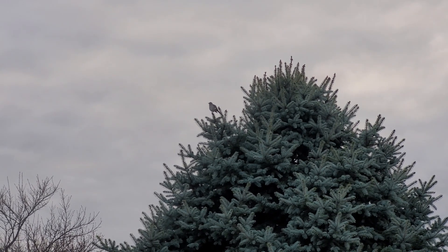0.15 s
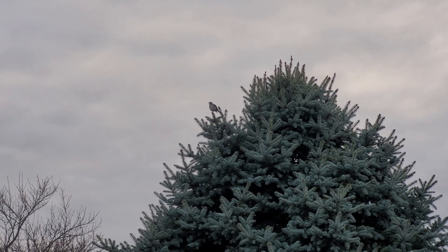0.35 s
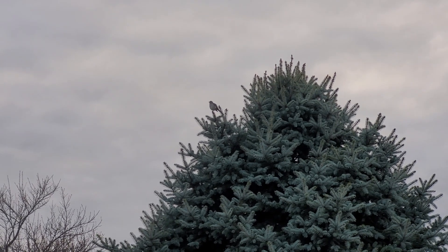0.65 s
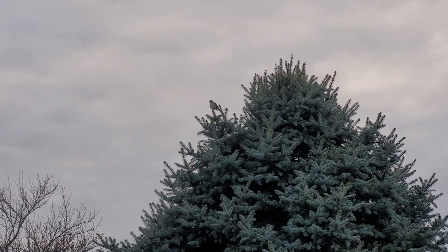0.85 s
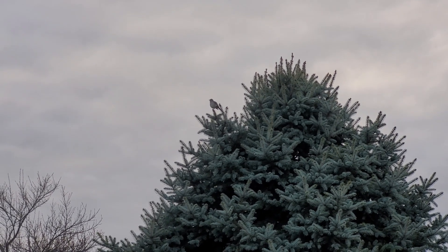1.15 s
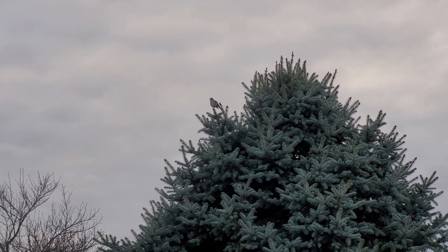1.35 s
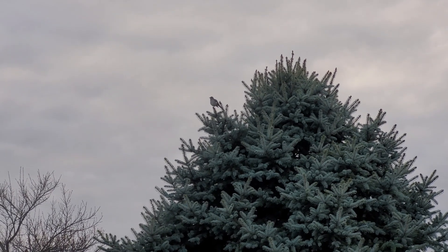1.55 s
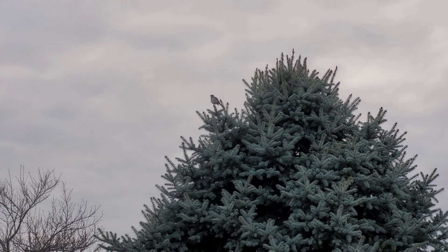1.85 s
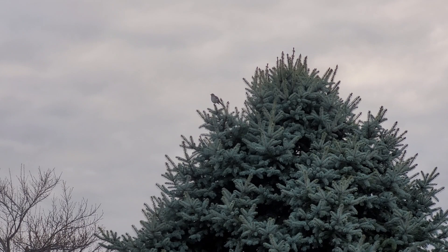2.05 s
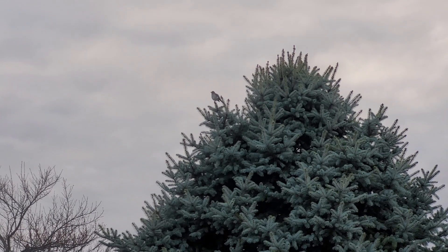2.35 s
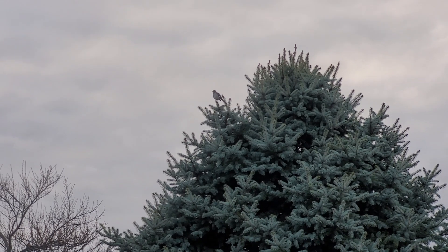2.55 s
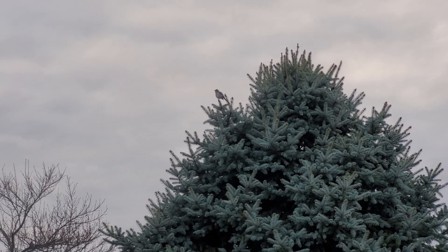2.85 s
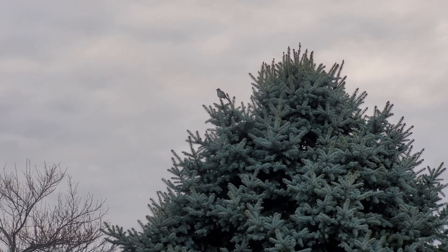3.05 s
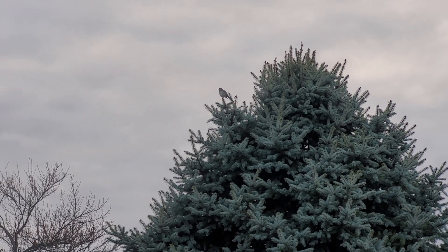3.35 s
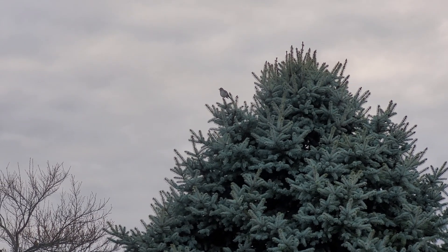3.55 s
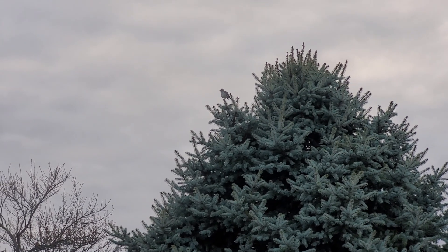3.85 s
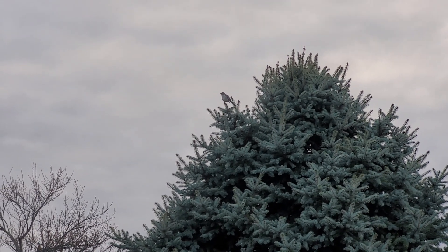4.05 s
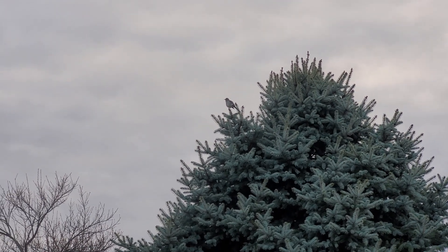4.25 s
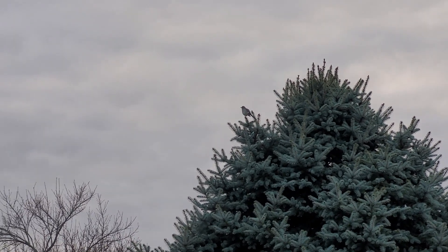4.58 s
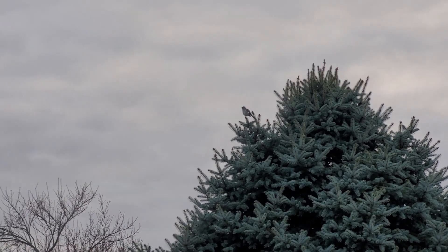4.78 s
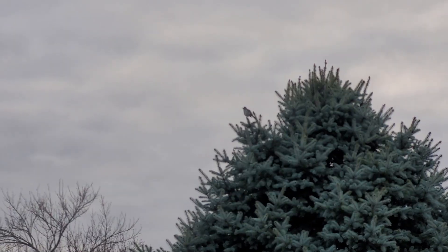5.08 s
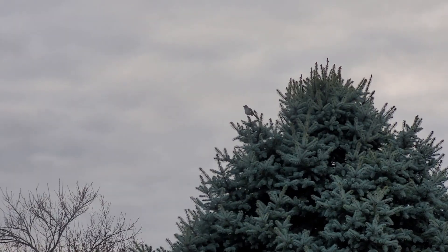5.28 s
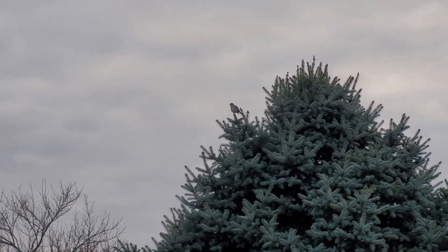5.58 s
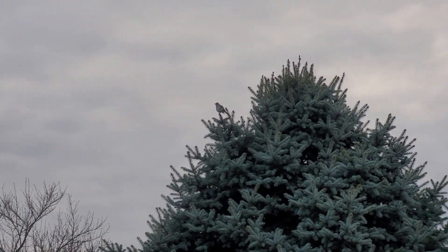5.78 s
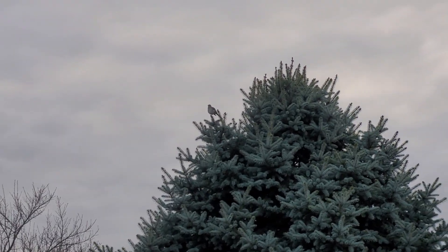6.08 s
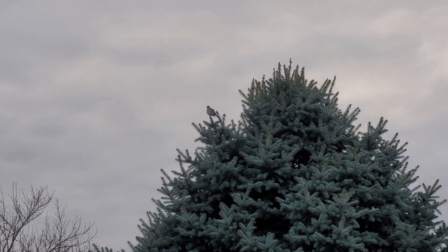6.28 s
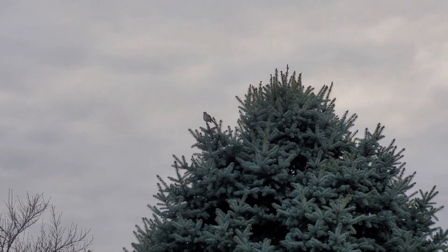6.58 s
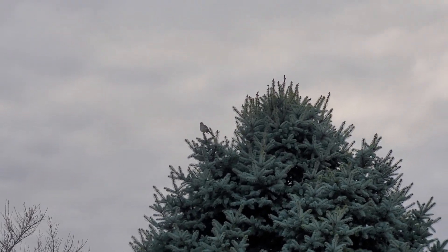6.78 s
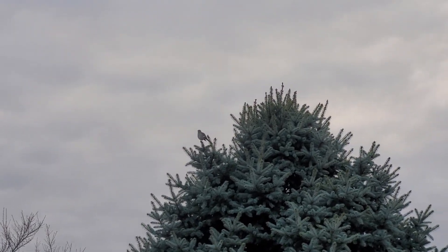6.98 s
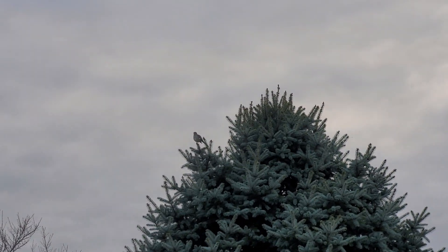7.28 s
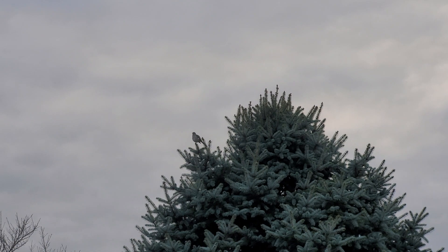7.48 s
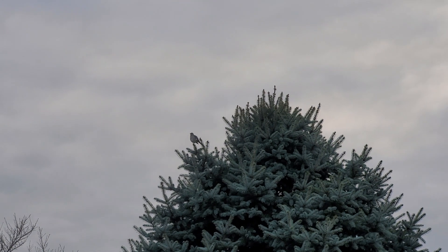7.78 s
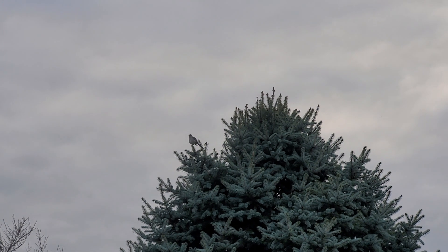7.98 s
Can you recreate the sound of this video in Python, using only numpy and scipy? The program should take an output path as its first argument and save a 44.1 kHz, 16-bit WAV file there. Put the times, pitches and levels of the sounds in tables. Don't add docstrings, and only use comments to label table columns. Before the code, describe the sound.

A short chip opens the scene at 0 s, with faint far chirps, finger rubbing and small dry ticks close to the left microphone. From 1.0 to 1.7 s the bird gives three buzzy, rasping trills near 2 kHz, each capped by a chip. Handling knocks gather from 1.8 s and peak at 2.2-2.3 s in a heavy, boomy double thump, far louder than the song. Quick plunging and slurred notes run from 2.35 to 3.1 s. Sliding whistles, each high then scooping low, come around 3.6, 3.9, 4.2, 5.0 and 5.3 s, with a faint high trill far off from 4 to 5 s and softer bumps and cloth brushes. A bright, loud flurry arrives at 6.1-6.3 s, a shorter one at 6.8 s, then brief rising whistles at 7.3 and 7.75 s. Ticks continue to about 8 s over fluctuating low traffic rumble, wind and light hiss, with faint echoes.

```python
import sys
import numpy as np
from scipy import signal
from scipy.io import wavfile
from scipy.ndimage import uniform_filter1d

SR = 44100
rng = np.random.default_rng(int(sys.argv[2]) if len(sys.argv) > 2 else 0)


def natural_amplitude(level_db):
    exponent = np.asarray(level_db, float) / 20
    return 10 ** exponent


def generate_wav(signal):
    frames = np.transpose(np.atleast_2d(signal))
    scaled = np.clip(frames, -1, 1) * 32767
    pcm = np.round(scaled).astype(np.int16)
    wavfile.write(sys.argv[1], SR, pcm)


N = 358533

# (start [s], end [s], pitch [Hz], level [dB])
TRILLS = [
    (1.0, 1.103, 2292, -52.5),
    (1.031, 1.096, 2035, -48),
    (1.248, 1.356, 2360, -49.5),
    (1.29, 1.355, 2053, -44.5),
    (1.511, 1.625, 2320, -49),
    (1.565, 1.645, 1988, -46.5),
]
# (multiple of the pitch [-], level [dB])
OVERTONES = [(2, -44), (3, -46)]
# (share of length [0-1], place between the two pitches [0-1], level [dB])
SLUR_SHAPE = [(0, 0.12, 1.5), (.25, 0.2, -1.5), (.55, .55, -2.5), (.8, .8, 0.5), (1, 0.4, -7)]
CHIP_SHAPE = [(0, 0.056, -8.5), (.3, 0.08, 8), (.46, 0.3, -1), (.8, 0.85, -9), (1, 1, -20)]
PLUNGE_SHAPE = [(0, .76, -16), (.25, .76, 0), (.54, 1, -4), (.66, .85, -4), (1, -.08, -6)]
STEP_SHAPE = [(0, 1, -6), (.25, .55, -5), (.65, 0.64, -1.5), (.8, .4, -17), (1, 0, -8)]
SCOOP_SHAPE = [(0, 0.13, -14.5), (.2, 0.75, -3), (.5, 1, 3), (.85, 0.79, 0), (1, 0, -12.5)]
SWELL_SHAPE = [(0, 0.082, -17), (.3, 0.64, -6), (.85, 1, 0.5), (1, 0.22, -36)]
# (start [s], length [s], first pitch [Hz], second pitch [Hz], rms level [dB])
SLURS = [(2.426, 0.035, 1985, 2830, -46.5), (2.65, 0.034, 1926, 1996, -52),
         (2.872, 0.037, 2190, 2970, -54.5), (6.075, 0.046, 1188, 1745, -65), (6.114, .012, 1644, 2430, -56),
         (6.118, 0.043, 2316, 2267, -42.5), (6.221, 0.017, 2230, 2325, -41),
         (6.226, 0.013, 2200, 2470, -39), (6.24, 0.0083, 2040, 1980, -42.5),
         (6.246, 0.016, 1920, 1820, -45.5), (6.256, 0.032, 1677, 1340, -55.5),
         (6.282, 0.044, 1367, 1675, -61), (6.746, 0.05, 1570, 1540, -72.5),
         (6.785, .014, 1500, 2400, -65.5), (6.794, 0.035, 1910, 1650, -56.5),
         (6.829, 0.017, 1905, 2165, -43.5), (6.848, 0.013, 2140, 1950, -49.5),
         (6.867, 0.019, 1884, 2150, -48), (6.879, 0.01, 2150, 1945, -38.5),
         (6.883, 0.02, 2220, 2380, -44.5), (6.884, 0.015, 2350, 3130, -54.5),
         (7.328, 0.015, 2660, 3660, -52), (7.783, 0.014, 2660, 3380, -52.5)]
CHIPS = [
    (-0.014, 0.047, 2306, 2387, -46.5),
    (1.101, 0.049, 2030, 2356, -45.5),
    (1.362, 0.055, 2008, 2420, -48),
    (1.653, 0.031, 1987, 2230, -42.5),
]
PLUNGES = [
    (2.35, 0.088, 1960, 2593, -52.5),
    (2.805, 0.063, 1906, 2536, -47.5),
]
STEPS = [
    (2.516, 0.065, 1906, 2516, -45.5),
    (2.978, 0.058, 1894, 2730, -49.5),
]
SCOOPS = [
    (2.593, 0.0675, 1970, 2034, -46),
    (3.048, 0.077, 1897, 2087, -49.5),
]
SWELLS = [
    (6.156, 0.073, 2290, 2364, -40),
]
# (time [s], pitch [Hz], level [dB])
LEAD_INS = [
    [(3.575, 2450, -78), (3.589, 2436, -57.5), (3.609, 2606, -64), (3.621, 2007, -62), (3.625, 2004, -64)],
    [(3.866, 2500, -79), (3.882, 2404, -56.5), (3.89, 2350, -71), (3.896, 2030, -52.5), (3.91, 1690, -71)],
    [(4.198, 2400, -78.5), (4.208, 2447, -61.5), (4.222, 2426, -53), (4.234, 2480, -70.5),
     (4.256, 1760, -60.5)],
    [(4.947, 2426, -78), (4.961, 2400, -53.5), (4.985, 2584, -66), (4.993, 2430, -52.5), (5.005, 1800, -59)],
    [(5.24, 2110, -85), (5.25, 2390, -67), (5.262, 2420, -68.5), (5.284, 1690, -66), (5.29, 1690, -59)],
]
# (time [s], pitch [Hz], level [dB])
LONG_SCOOPS = [
    [(3.625, 1770, -67.5), (3.653, 1952, -50), (3.669, 2040, -46), (3.679, 2085, -52), (3.723, 2044, -51),
     (3.729, 1990, -55), (3.748, 1946, -73)],
    [(3.91, 1714, -62), (3.926, 1725, -58.5), (3.956, 2033, -48), (3.968, 2130, -60.5), (3.998, 2064, -50),
     (4.026, 2002, -53.5), (4.048, 2094, -64.5)],
    [(4.256, 1790, -61), (4.262, 1713, -63), (4.278, 1910, -54.5), (4.298, 2064, -49.5),
     (4.35, 2167, -57.5), (4.384, 2070, -61), (4.395, 2040, -63)],
    [(5.005, 1823, -59), (5.029, 1897, -51), (5.043, 2116, -51), (5.063, 2115, -49.5), (5.077, 2204, -60.5),
     (5.093, 2030, -53), (5.115, 2130, -64)],
    [(5.29, 1687, -57), (5.31, 1910, -56), (5.338, 2027, -50.5), (5.366, 2092, -50), (5.414, 1968, -49.5),
     (5.432, 2067, -60.5), (5.448, 1990, -62.5)],
]
# (time [s], pitch [Hz], level [dB])
RISES = [
    [(7.292, 1850, -80.5), (7.306, 2340, -53), (7.316, 2540, -62.5), (7.324, 2550, -49.5),
     (7.334, 2623, -53.5), (7.342, 2690, -62)],
    [(7.733, 1880, -83), (7.753, 2340, -56.5), (7.759, 2357, -57), (7.763, 2527, -56), (7.781, 2615, -52),
     (7.791, 2630, -69.5)],
]
BEAK_LIFTS = [0, 0, 2, 0, 0, 2, 0, 2, 4, 4, -1, 20]
WHISTLE_DB = 6
WAVER_DB, WAVER_SHARE = 2.2, .007

# (delay [s], level [dB])
ECHOES = [
    (.128, -21.5),
    (.24, -39.5),
]
# (time [s], level sent to wall [dB])
TURNED = [
    (0.0, -4),
    (.9, 0),
    (2.3, -5),
    (4.6, 5),
    (6.3, -7),
    (6.75, -1.5),
    (8.13, -6.5),
]
SCATTER_T60_S, SCATTER_DB = 0.27, -17
EAR_LAG_S, LEFT_SHADE_DB = .00048, -11

# (time [s], ring level [dB], ring pitch [Hz], flex level [dB], thud level [dB])
KNOCKS = [(1.835, -33, 244, -44, -30.5), (1.984, -35, 297, -33, -25), (2.012, -24.5, 275, -29, -20),
          (2.036, -30, 315, -23.5, -24), (2.069, -23.5, 342, -25.5, -18.5), (2.106, -26, 380, -16.5, -22),
          (2.127, -29, 424, -25, -38), (2.141, -22, 302, -16, -22), (2.162, -26.5, 446, -29, -41),
          (2.174, -19.5, 326, -18.5, -27), (2.208, -27, 480, -27, -38), (2.2206, -5, 472, -8.5, -10),
          (2.262, -14, 398, -30, -22), (2.2825, -6, 337, -25, -13.5), (2.297, -28, 424, -22, -38),
          (2.324, -26.5, 420, -27, -60), (2.381, -31, 420, -30, -33), (2.735, -33.5, 230, -41, -38.5),
          (3.066, -36, 304, -42, -42), (4.468, -22.5, 302, -47, -36), (4.55, -30.5, 322, -42, -37),
          (5.046, -29, 415, -33, -39), (5.626, -33, 224, -41.5, -29.5), (5.89, -36, 346, -27, -42.5),
          (6.093, -36, 368, -33.5, -35.5), (6.495, -30, 378, -28, -26.5)]
RING_T60_S, FLEX_HZ, FLEX_T60_S, THUD_HZ, THUD_T60_S = 0.02, 240, 0.045, 63.3, 0.11
CRUNCH_PER_S, CRUNCH_DB = 220, -47.5
CRUNCH_FOLLOWS = 2.14
# (time [s], peak level [dB], left minus right [dB])
TICKS = [(0.1341, -57, -2), (0.3, -50, 2), (0.4858, -47.5, 9), (0.7048, -46, 9), (0.9527, -52, 20),
         (0.9637, -52.5, 9), (1.1543, -65.5, 18), (1.1822, -54, 13.5), (1.1956, -45, 11), (1.2245, -49, 9),
         (1.279, -55.5, 15.5), (1.4337, -38, 14), (1.4768, -33.5, 8), (1.507, -42, 0), (1.5345, -51, 10.5),
         (1.5775, -48.5, 6), (1.6222, -60, 5), (1.7828, -63.5, 12.5), (1.7945, -53, 9), (1.9225, -50.5, 17),
         (1.9375, -50, 12), (1.9598, -44.5, 8), (2.2196, -36.5, 11), (2.2625, -38, 19), (2.2828, -43, 20),
         (2.6259, -57, 11), (2.644, -50.5, 15), (2.7362, -50, 7), (2.9535, -56, 18), (2.9796, -51.5, 15),
         (3.0445, -57, 17), (3.0617, -45, 15), (3.2794, -52, 9), (3.5486, -56, 14.5), (3.5626, -45.5, 10),
         (3.651, -52, 19), (3.7946, -50, 15.5), (3.8577, -44, 15), (3.9428, -37, 9), (4.0264, -47, 7),
         (4.133, -56.5, 11), (4.3026, -70, 6), (4.3039, -45.5, 16), (4.701, -56, 11.5),
         (5.1801, -33.5, 17.5), (6.0623, -58.5, 18)]
# (time [s], peak level [dB], left minus right [dB])
LATE_TICKS = [(6.8279, -63, 10.5), (6.8423, -57, 10.0), (6.945, -57.5, 21), (7.006, -53, 24),
              (7.116, -63, 13.0), (7.3327, -44, 24), (7.4957, -61, 17.0), (7.539, -53, 30),
              (7.5787, -56, 24), (7.5974, -57, 16), (7.612, -54, 17.0), (7.8273, -49, 25.0),
              (7.8328, -50, 15), (7.864, -65, 12), (7.886, -51.5, 19.0), (7.9623, -64.5, 8.5),
              (7.999, -48.5, 28), (8.0073, -49.5, 18.0), (8.04, -51.5, 13)]
FAINT_TICK_DB = -51
# (time [s], peak level [dB], left minus right [dB])
LOW_TICKS = [
    (2.2198, -21.5, 2.5),
    (2.245, -45, 10),
    (2.2626, -29.5, 17),
    (2.2828, -32, 4),
    (5.482, -56, 2),
    (5.555, -53.5, 18),
    (5.674, -43.5, 0),
    (5.695, -58, -1),
]
# (time [s], peak level [dB], left minus right [dB])
CLICKS = [
    (1.822, -59, 7),
    (2.0885, -57, -13),
    (2.244, -57, 7.5),
    (2.2626, -42.5, 6),
    (2.2828, -45, 13),
]
# (time [s], level [dB], half width [s])
RUB = [(0.03, -62.5, 0.16), (0.512, -63.5, 0.1), (0.74, -60.5, 0.064), (1.212, -66, 0.25),
       (1.49, -66.5, 0.14), (2.269, -66.5, 0.36), (2.622, -69.5, 0.018), (3.501, -69, 0.52),
       (3.93, -61, 0.048), (4.31, -71.5, 0.074), (5.179, -71, 0.21), (5.388, -70.5, 0.12),
       (6.51, -63, 0.12), (6.86, -73.5, 0.055), (7.039, -64.5, 0.034), (7.38, -73, .05), (7.57, -72, 0.082),
       (7.75, -66, 0.075)]
# (time [s], level [dB])
FLICKS = [(0.289, -58.5), (0.377, -61), (0.963, -56.5), (1.05, -61.5), (1.802, -62), (1.95, -59),
          (2.439, -77), (2.75, -60.5), (2.881, -72.5), (2.97, -61.5), (3.068, -60), (3.27, -69.5),
          (4.14, -75), (4.699, -66.5), (4.815, -69.5), (4.942, -67), (5.04, -62), (5.696, -68),
          (5.891, -67), (6.061, -67), (6.181, -63.5), (6.95, -68), (7.489, -70), (7.83, -77), (8.014, -67)]
FLICK_HALF_S = .022
# (frequency [Hz], level [dB per Hz])
RUB_COLOR = [(4500, -19), (5400, -35.5), (7400, 2), (9000, -35), (12900, -0.5), (15200, -4), (16000, -7.5)]
# (start [s], length [s], low edge [Hz], high edge [Hz], level [dB])
BRUSHES = [(0.098, 0.12, 980, 1160, -69.5), (0.114, 0.088, 1300, 1660, -71),
           (0.09, 0.17, 2030, 2670, -73.5), (0.335, 0.12, 900, 1370, -75.5), (0.338, 0.11, 2200, 2620, -75),
           (0.573, 0.11, 820, 2460, -73.5), (0.726, 0.048, 754, 2720, -73.5),
           (1.797, 0.22, 1110, 2570, -72.5), (2.214, 0.11, 701, 6014, -62), (2.579, 0.14, 1010, 1700, -72),
           (3.338, 0.26, 6360, 8450, -75.5), (3.623, 0.16, 6100, 7920, -78), (4.465, 0.056, 492, 5780, -62),
           (4.534, 0.094, 496, 6300, -65), (4.599, 0.2, 493, 6070, -67.5), (4.981, 0.19, 506, 6350, -67.5),
           (5.341, 0.11, 496, 4840, -67), (5.453, 0.29, 490, 1520, -75.5), (5.865, 0.074, 500, 1890, -68.5),
           (6.474, 0.1, 3680, 4730, -71.5), (4.612, 0.16, 422, 710, -58.5), (4.767, 0.098, 411, 664, -66),
           (4.933, 0.086, 420, 665, -63), (5.295, 0.071, 410, 730, -59.5), (6.42, 0.33, 570, 1990, -73.5)]

# (time [s], length [s], start pitch [Hz], end pitch [Hz], level [dB])
FAR_BIRDS = [(5.81, .1, 5500, 5700, -86), (2.0, .06, 1670, 1780, -77), (2.29, .06, 1740, 1770, -75),
             (1.592, .056, 4080, 3720, -67.5), (1.632, .064, 3720, 2760, -67.5),
             (.05, .055, 2800, 1720, -67), (.1, .04, 2680, 2200, -70), (.185, .04, 1960, 1900, -76),
             (.025, .035, 2150, 1750, -74), (.006, .028, 4420, 4380, -79), (6.47, .03, 1950, 1980, -78),
             (5.038, .05, 4120, 4420, -75), (7.79, .085, 3200, 3050, -83)]
# (first note [s], note length [s], start pitch [Hz], end pitch [Hz], level [dB])
FAR_TRILL = (4.052, .05, 5170, 5500, -82)
FAR_PERIOD_S = .0745
# (time [s], rumble level [dB], buffeting level [dB])
RUMBLE = [(0.0, -61, -62), (0.3, -64, -78), (1.8, -60, -75.5), (2.0, -49, -63), (2.3, -55, -52.5),
          (2.42, -57.5, -74), (3.45, -66.5, -79.5), (4.0, -59.5, -72), (4.1, -62.5, -64.5),
          (4.5, -48.5, -62.5), (4.8, -50, -81), (5.4, -58.5, -59), (5.5, -63.5, -72.5), (6.0, -62.5, -65),
          (6.35, -65.5, -70), (7.05, -54, -71), (7.7, -63, -65), (8.12, -74.5, -82.5)]
# (frequency [Hz], level [dB per Hz])
RUMBLE_COLOR = [(90, -14.5), (156, 4.5), (230, 0.5), (290, -2.5), (380, -4), (600, -33)]
# (frequency [Hz], level [dB per Hz])
AIR_COLOR = [(600, 2.5), (1000, -2.5), (2000, -3), (8400, -13.5), (12800, -4), (15500, -8.5)]
AIR_DB = -80


def rms_one(x):
    return x / np.sqrt(np.mean(x ** 2) + 1e-20)


def in_time(rows):
    s, *columns = np.transpose(rows)
    return [np.interp(np.arange(N) / SR, s, c) for c in columns]


def drift(rate):
    steps_per_s = 400
    steps = rng.standard_normal(int(N / SR * steps_per_s) + 2)
    r = np.exp(-2 * np.pi * rate / steps_per_s)
    slow = signal.lfilter([1], [1, -2 * r, r * r], steps)
    return np.interp(np.arange(N) / SR * steps_per_s, np.arange(len(slow)), rms_one(slow))


def filtered(x, order, hz, kind="low"):
    return signal.sosfilt(signal.butter(order, hz, kind, fs=SR, output="sos"), x)


def noise(spectrum, alike, patchy_db, rate):
    hz, level_db = np.transpose(spectrum)
    edges = hz[0] * 2 ** np.arange(0, np.log2(hz[-1] / hz[0]) + 1 / 3, 1 / 3)
    white = rng.standard_normal((2, 2, N))
    alike = np.clip(alike, -1, 1)
    out = 0
    for k, (low, high) in enumerate(zip(edges, np.minimum(edges[1:], .45 * SR))):
        mid, side = filtered(white[k % 2], 2, [low, high], "band")
        band_db = np.interp(np.log(low * high) / 2, np.log(hz), level_db)
        gain = natural_amplitude(band_db + patchy_db * drift(rate))
        out = out + gain * (np.sqrt(1 + alike) * mid + np.sqrt(1 - alike) * side * [[1], [-1]])
    return rms_one(out)


def add(track, s, x):
    i = round(s * SR)
    x, i = x[..., max(-i, 0):N - i], max(i, 0)
    track[..., i:i + x.shape[-1]] += x


def tone(hz, gain, beak_db=0):
    phase = 2 * np.pi * np.cumsum(hz) / SR
    overtones = sum(natural_amplitude(db + beak_db * (k == 2)) * np.sin(k * phase) for k, db in OVERTONES)
    brightness = natural_amplitude(0.04 * (np.clip(hz, 2250, 2650) - 2300))
    return np.sqrt(2) * gain * (np.sin(phase) + brightness * overtones)


def syllables(waver):
    out = np.zeros(N)
    kinds = [(SLUR_SHAPE, SLURS), (CHIP_SHAPE, CHIPS), (PLUNGE_SHAPE, PLUNGES),
             (STEP_SHAPE, STEPS), (SCOOP_SHAPE, SCOOPS), (SWELL_SHAPE, SWELLS)]
    for shape, rows in kinds:
        share, place, shape_db = np.transpose(shape)
        for start, length, first_hz, second_hz, db in rows:
            t = np.arange(0, length, 1 / SR)
            size = len(t) // 8 + 1
            fade_in = (t / min(.006, 0.2 * length)) ** 2
            fade_out = (length - t) / min(.012, 0.43 * length)
            edge = np.clip(np.minimum(fade_in, fade_out), 0, 1)
            rough = waver[abs(round(start * SR)):][:len(t)]
            hz = first_hz + (second_hz - first_hz) * np.interp(t / length, share, place)
            glide = uniform_filter1d(hz, size=size, mode="nearest") * (1 + WAVER_SHARE * rough)
            level_db = np.interp(t / length, share, shape_db)
            level_db = uniform_filter1d(level_db, size=size, mode="nearest")
            add(out, start, tone(glide, edge * natural_amplitude(db + level_db + WAVER_DB * rough)))
    return out


def whistles(waver):
    out = np.zeros(N)
    for rows, beak_db in zip(LEAD_INS + LONG_SCOOPS + RISES, BEAK_LIFTS):
        s, hz, db = np.transpose(rows)
        t = np.arange(s[0] - .002, s[-1] + .002, 1 / SR)
        edge = np.clip(np.minimum(t - t[0], t[-1] - t) / .004, 0, 1)
        rough = waver[round(s[0] * SR):][:len(t)]
        glide = uniform_filter1d(np.interp(t, s, hz), size=300, mode="nearest")
        level_db = uniform_filter1d(np.interp(t, s, db), size=300, mode="nearest")
        gain = edge * natural_amplitude(level_db + WHISTLE_DB + WAVER_DB * rough)
        add(out, t[0], tone(glide * (1 + WAVER_SHARE * rough), gain, beak_db))
    return out


def trills(waver):
    out = np.zeros(N)
    for start, end, hz, level_db in TRILLS:
        t = np.arange(0, end - start, 1 / SR)
        cycle = (t * 88) % 1
        rough = waver[round(start * SR):][:len(t)]
        swell = np.sin(np.pi * t / t[-1]) ** 0.58 * np.sin(np.pi * cycle) ** 0.92
        glide = hz * (1 + 0.079 * (cycle - .5) + 0.029 * rough)
        add(out, start, tone(glide, swell * natural_amplitude(level_db + 0.5 * rough)))
    return out


def singer():
    waver = drift(64)
    return syllables(waver) + whistles(waver) + trills(waver)


def garden(x):
    t = np.arange(round(.6 * SR)) / SR
    tail = rng.standard_normal((2, len(t))) * natural_amplitude(-60 * t / SCATTER_T60_S) * (t > .004)
    tail = natural_amplitude(SCATTER_DB) * tail / np.sqrt(np.sum(tail ** 2, axis=1, keepdims=True))
    tail = filtered(tail, 3, 3600)
    tail[0, 0] += natural_amplitude(LEFT_SHADE_DB)
    tail[1, round(EAR_LAG_S * SR)] += 1

    fade = np.exp(-np.arange(3000) / [[[700]], [[1500]]])
    blur = rng.standard_normal((len(ECHOES), 2, 3000)) * [[[.05]], [[.06]]] * fade
    blur[0, :, 0] = 1
    wall = np.zeros_like(tail)
    for (delay, db), smear in zip(ECHOES, blur):
        add(wall, delay, natural_amplitude(db) * smear)
    sent = filtered(x * natural_amplitude(in_time(TURNED)[0]), 3, 2900)
    near = signal.fftconvolve(x[None], tail, axes=1)
    return (near + signal.fftconvolve(sent[None], wall, axes=1))[:, :N]


def knocks():
    out, t = np.zeros((2, N)), np.arange(round(.25 * SR)) / SR
    grips = 1 + .2 * rng.standard_normal((len(KNOCKS), 2))
    for (s, ring_db, hz, flex_db, thud_db), (firm, loose) in zip(KNOCKS, grips):
        soft = (1 - np.exp(-t / (.00042 * natural_amplitude(-.4 * ring_db)))) ** 2
        ring = -natural_amplitude(ring_db - 60 * t / RING_T60_S) * np.sin(2 * np.pi * hz * t)
        flex = -natural_amplitude(flex_db - 60 * t / FLEX_T60_S) * np.cos(2 * np.pi * FLEX_HZ * firm * t)
        sway = natural_amplitude(flex_db - 3.5 - 60 * t / 0.09) * np.sin(2 * np.pi * 122 * firm * t)
        thud = natural_amplitude(thud_db - 60 * t / THUD_T60_S) * np.sin(2 * np.pi * THUD_HZ * loose * t)
        blow = ring * [[1.3], [.7]] + flex * [[1.2], [-.8]]
        blow = blow + sway * [[.8], [-1.1]] + thud * [[.85], [-.3]]
        add(out, s, soft * blow)
        if ring_db > -12:
            add(out[1], s - .0014, natural_amplitude(flex_db - .5) * np.hanning(round(0.0015 * SR)))
    return filtered(out, 2, 38, "high")


def crunch(buffet_db):
    jolts = (rng.random((2, N)) < CRUNCH_PER_S / SR) * rng.standard_normal((2, N))
    body = filtered(jolts[0] + 1.1 * jolts + 1e-18, 2, [200, 550], "band")
    body = filtered(body, 4, 650)
    level_db = CRUNCH_DB + CRUNCH_FOLLOWS * (buffet_db - buffet_db.max())
    return natural_amplitude(level_db) * rms_one(body) * [[1.3], [.7]]


def snaps(rows, low_hz, high_hz, decay_s):
    out, t = np.zeros((2, N)), np.arange(500) / SR
    for (s, db, pan_db), burst in zip(rows, rng.standard_normal((len(rows), 2, 500))):
        snap = filtered(np.diff(burst, prepend=0) * np.exp(-t / decay_s), 3, [low_hz, high_hz], "band")
        snap = snap / abs(snap).max(axis=1, keepdims=True)
        sides = 2 / (1 + natural_amplitude([[-pan_db], [pan_db]]))
        add(out, s, natural_amplitude(db) * snap * sides)
    return out


def ticks():
    rows = TICKS + LATE_TICKS
    firm = [row for row in rows if row[1] >= FAINT_TICK_DB]
    faint = [row for row in rows if row[1] < FAINT_TICK_DB]
    out = snaps(CLICKS, 2000, 5500, .0004)
    out += snaps(firm, 5300, 16500, .0008)
    out += snaps(faint, 9000, 15500, .0015)
    return out + snaps(LOW_TICKS, 500, 2200, 0.0006)


def rubbing():
    t = np.arange(N) / SR
    power = np.zeros(N)
    for s, db, width in RUB + [(*row, FLICK_HALF_S) for row in FLICKS]:
        half_s = np.where(t < s, 0.2 * width, width)
        power += natural_amplitude(2 * db) / (1 + ((t - s) / half_s) ** 2) ** 2
    slips = (rng.random(N) < 60 / SR) * np.minimum(rng.exponential(.8, N), 2)
    slips = signal.lfilter([1], [1, -np.exp(-1 / (0.0012 * SR))], slips)
    grain = natural_amplitude(2.2 * drift(22)) * (1 + slips)
    hiss = noise(RUB_COLOR, alike=0, patchy_db=1.0, rate=2)
    hiss = signal.sosfilt(signal.cheby2(12, 40, 16000, fs=SR, output="sos"), hiss)
    return natural_amplitude([[-1], [-10]]) * np.sqrt(power) * grain * hiss


def brushes():
    out = np.zeros((2, N))
    grainy = signal.lfilter([1], [1, -.8], rng.standard_normal((2, N))) * natural_amplitude(2.2 * drift(41))
    for s, length, low_hz, high_hz, db in BRUSHES:
        size = round(length * SR)
        piece = grainy[:, round(s * SR):][:, :size]
        puff = rms_one(filtered(piece, 3, [low_hz, high_hz], "band"))
        add(out, s, natural_amplitude(db) * puff * np.sin(np.pi * np.linspace(0, 1, size) ** 0.63) ** 2.3)
    return out


def far_birds():
    out, (first, *chirp, top_db) = np.zeros(N), FAR_TRILL
    trill = [(first + k * FAR_PERIOD_S, *chirp, top_db - 1.3 * max(7 - k, k - 9, 0)) for k in range(12)]
    for s, length, from_hz, to_hz, db in FAR_BIRDS + trill:
        size = round(length * SR)
        phase = 2 * np.pi * np.cumsum(np.linspace(from_hz, to_hz, size)) / SR
        add(out, s, np.sqrt(2) * natural_amplitude(db) * np.hanning(size) ** .5 * np.sin(phase))
    smear = rng.standard_normal((2, 4000)) * .036 * np.exp(-np.arange(4000) / 1000)
    smear[:, 0] = [.7, 1]
    return signal.fftconvolve(out[None] * natural_amplitude(1.5 * drift(60)), smear, axes=1)[:, :N]


def traffic(rumble_db):
    rumble = natural_amplitude(rumble_db) * noise(RUMBLE_COLOR, alike=0.65, patchy_db=4.5, rate=5.2)
    return filtered(rumble, 4, 560)


def buffeting(buffet_db):
    color = [(30, -11.0), (55, -5.5), (110, -12.5)]   # (frequency [Hz], level [dB per Hz])
    return natural_amplitude(buffet_db + 4.5) * noise(color, alike=1.0, patchy_db=5.5, rate=6.7)


def open_air():
    return natural_amplitude(AIR_DB) * noise(AIR_COLOR, alike=0, patchy_db=3.0, rate=5.6)


def scene():
    rumble_db, buffet_db = in_time(RUMBLE)
    song = garden(singer())
    handling = knocks() + crunch(buffet_db) + ticks() + rubbing() + brushes()
    background = far_birds() + traffic(rumble_db) + buffeting(buffet_db) + open_air()
    return song + handling + background


def low_pass(x):
    return signal.sosfilt(signal.butter(12, 16510, fs=SR, output="sos"), x)


def record(dry):
    rounded = np.tanh(dry)
    mix = signal.sosfilt(signal.cheby2(10, 50, 16700, fs=SR, output="sos"), rounded)
    return low_pass(mix)


dry = scene()
out = record(dry)
generate_wav(out)
```